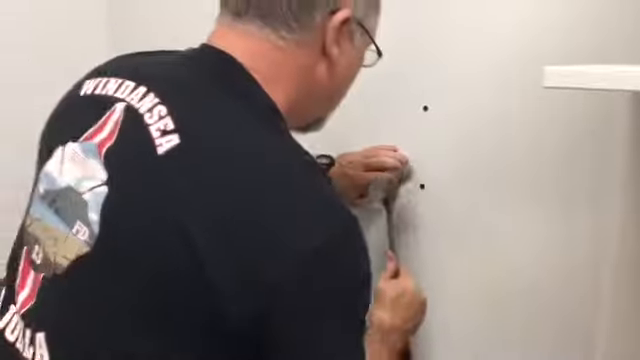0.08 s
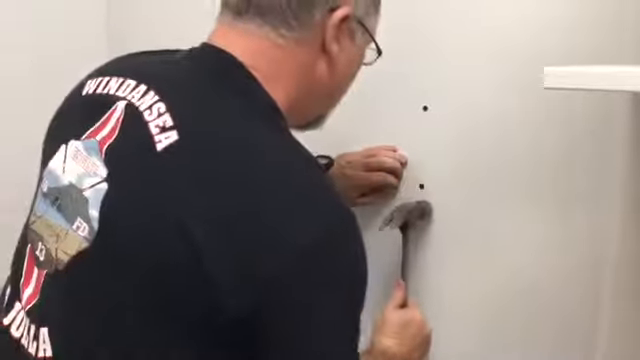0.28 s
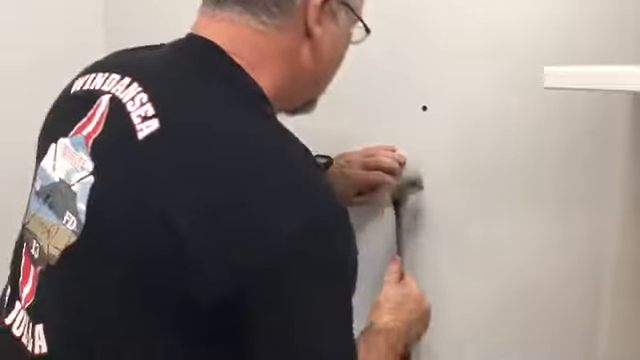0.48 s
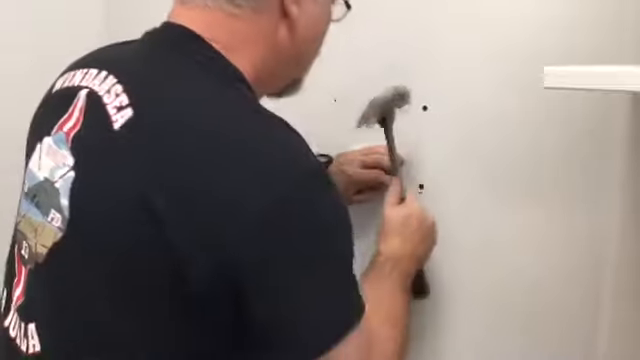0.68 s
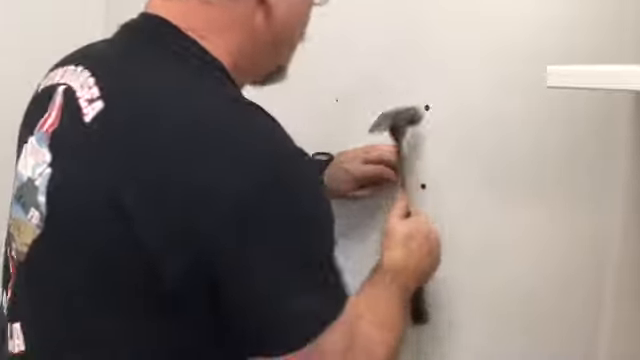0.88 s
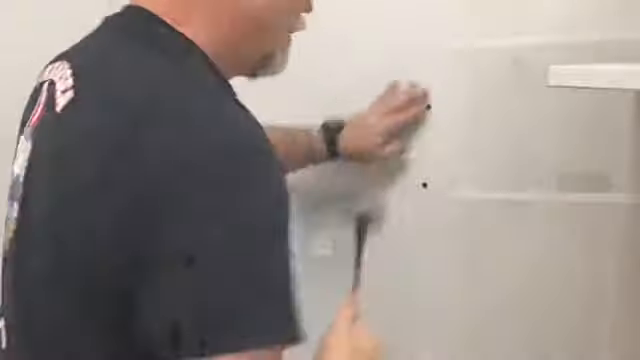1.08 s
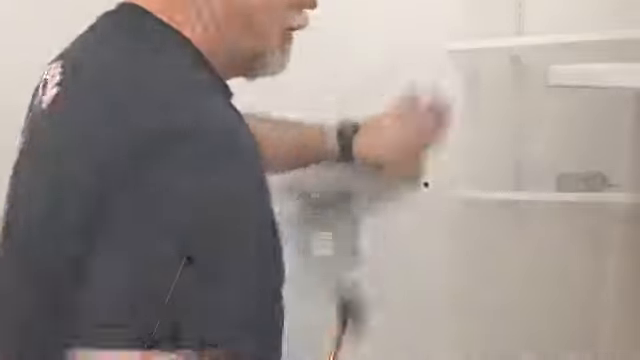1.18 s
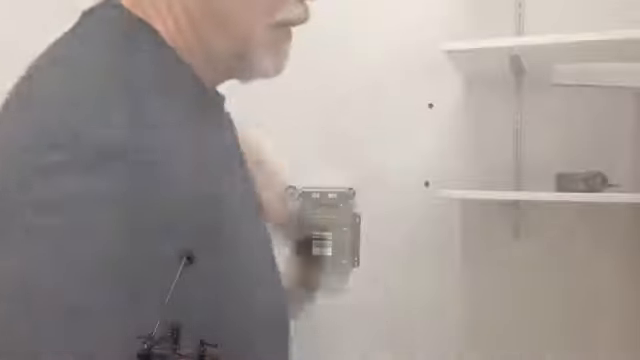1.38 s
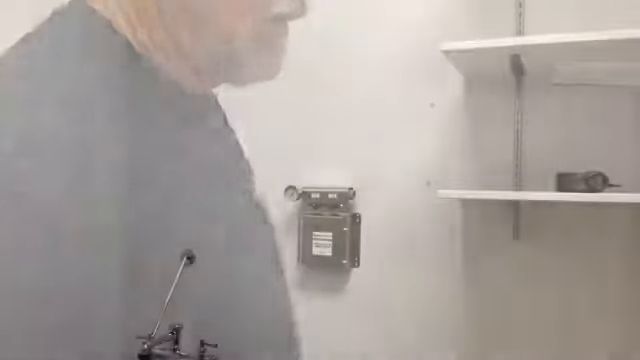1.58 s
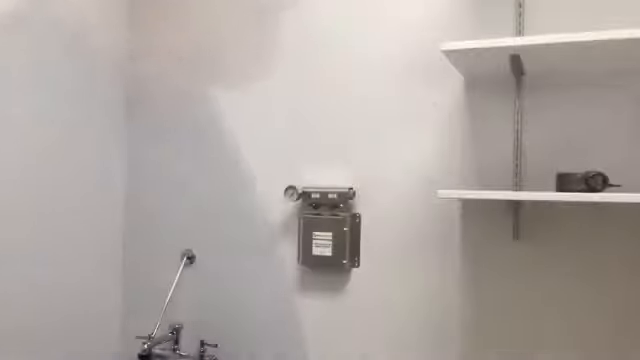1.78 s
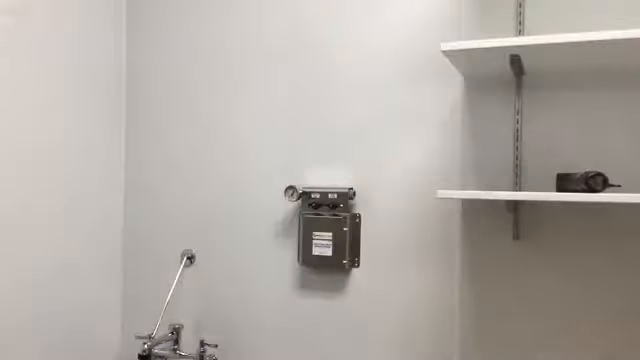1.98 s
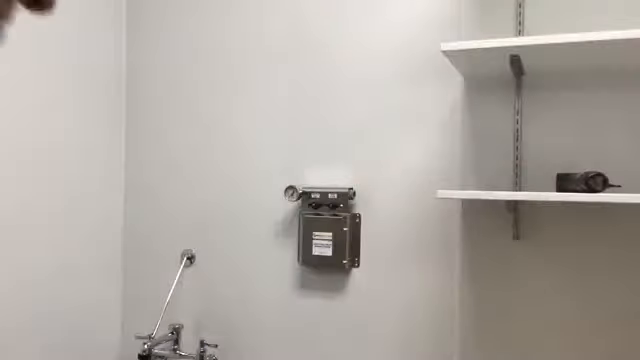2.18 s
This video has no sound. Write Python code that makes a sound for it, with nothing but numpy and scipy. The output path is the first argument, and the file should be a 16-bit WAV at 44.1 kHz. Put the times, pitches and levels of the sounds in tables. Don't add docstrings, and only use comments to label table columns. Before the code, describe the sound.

Hammer blows on a hollow plasterboard wall: a hard, boomy, clipped thud at 0.2 s, a slightly softer one at 0.9 s, each with a short crack and brief small-room ring. From 1.05 to 1.8 s, very faint grainy hand brushing and small squeaks, a dry tick near 1.67 s; soft knocks at 1.98 and 2.1 s, a last brush at 2.13 s. Low rumble, growing hum and faint hiss beneath.

```python
import sys
import numpy as np
from scipy import signal
from scipy.fft import rfft, irfft, next_fast_len
from scipy.io import wavfile
from scipy.ndimage import uniform_filter1d, map_coordinates

SR = 44100
rng = np.random.default_rng(int(sys.argv[2]) if len(sys.argv) > 2 else 0)


def volts_from_decibels(level):
    exponent = np.asarray(level, float) / 20
    return 10 ** exponent


def unload_wav(signal):
    wavfile.write(
        sys.argv[1],
        SR,
        np.round(np.clip(np.atleast_2d(signal).T, -1, 1) * 32767).astype(np.int16),
    )


N = 97020


def unit(x):
    return x / np.sqrt(np.mean(x ** 2) + 1e-20)


def along(points, hz):
    f, v = np.transpose(points)
    return np.interp(np.log(hz + 1), np.log(f + 1), v)


def filtered(x, response):
    m = next_fast_len(len(x) + 8192)
    return irfft(rfft(x, m) * response(np.fft.rfftfreq(m, 1 / SR)), m)[:len(x)]


def hiss(spectrum, size):
    return unit(filtered(rng.standard_normal(size), lambda hz: volts_from_decibels(along(spectrum, hz))))


def wobble(rate):
    knots = rng.standard_normal(int(N * rate / SR) + 4)
    return map_coordinates(knots, [np.arange(N) * rate / SR])


def add(out, x, s):
    part = out[round(s * SR):][:len(x)]
    part += x[:len(part)]


def bend(hz):
    lag_100hz_s = 0.007152
    return -np.exp(-2j * 2 * np.pi * lag_100hz_s * 10 * np.sqrt(hz))


def push(db, size):
    # frequency in Hz, level in dB.
    thump = [(60, -52.5), (110, 20), (300, 15.5), (800, 5), (2000, -11), (4000, -36), (8000, -61),
             (14000, -80.5)]
    click = volts_from_decibels(db) * (np.arange(size) == 0)
    return filtered(click, lambda hz: bend(hz) * volts_from_decibels(along(thump, hz)))


def tail(spectrum, size, late_db):
    # frequency in Hz, time to fall 60 dB in seconds.
    room_decay = [(60, 0.55), (200, 0.28), (1000, 0.27), (3000, 0.23), (8000, 0.2), (14000, 0.18)]
    clump_db, rise_s, late_longer = 1, 0.0013, 3.19
    hz, t, z = signal.stft(hiss(spectrum, size), SR, nperseg=256)
    fall_db = -60 * t / along(room_decay, hz)[:, None]
    clumps = uniform_filter1d(rng.standard_normal(z.shape), size=5, axis=0)
    clumps = unit(uniform_filter1d(clumps, size=3, axis=1))
    decay = volts_from_decibels(fall_db) + volts_from_decibels(late_db + fall_db / late_longer)
    echoes = signal.istft(z * volts_from_decibels(clump_db * clumps) * decay, SR, nperseg=256)[1][:size]
    return echoes * (1 - np.exp(-np.arange(size) / SR / rise_s))


def panel_boom(modes, t):
    boom = np.zeros(len(t))
    for hz, level, t60, rise in modes:
        envelope = volts_from_decibels(level - 60 * t / t60) * (1 - np.exp(-t / rise))
        boom += envelope * np.cos(2 * np.pi * hz * t)
    return filtered(boom, bend)


def steel_crack(t):
    # frequency in Hz, level in dB per Hz.
    crack_colour = [(1000, -29), (2800, 7.5), (4500, -7), (7500, -24.5), (13000, -15)]
    t60_s = .05
    return volts_from_decibels(-25 - 60 * t / t60_s) * hiss(crack_colour, len(t))


def lead_in(size):
    # frequency in Hz, level in dB per Hz.
    lead_colour = [(30, -14), (130, -1.5), (300, -8.5), (600, -19), (1600, -25.5), (3000, -28), (7000, -50.5),
                   (12000, -71.5)]
    lead_db, lead_s, step_s, before_step_db = -26, .05, 0.013, -10.5
    ahead = np.arange(size)[::-1] / SR
    step_db = before_step_db / (1 + np.exp((step_s - ahead) / .001))
    swell = volts_from_decibels(lead_db + step_db - 30.5 * ahead / lead_s)
    return hiss(lead_colour, size) * swell * (1 - np.exp(-ahead / 0.00091))


def hammer():
    # start in seconds, strength in dB, level of the late room sound in dB.
    blows = [
        (0.2233, 3, -21),
        (0.8863, 2, -23.5),
    ]
    # frequency in Hz, level in dB, time to fall 60 dB and rise in seconds.
    panel = [
        [(104, -12.5, 0.12, 0.0011), (129.7, 8.5, 0.078, 0.0049), (156.6, -17, .4, .01),
         (179.6, -18.5, .33, .01), (199, -15, .3, 0.0033), (223.7, -10.5, 0.25, .02),
         (243.6, -10, 0.26, 0.0026), (270, -17, .2, .002), (403.3, -19.5, 0.22, .003), (548, -19, 0.25, 0.0018),
         (595, -22.5, 0.18, 0.006), (868, -19.5, 0.07, .002), (1276, -24, 0.13, 0.0019)],
        [(117.5, -8.5, 0.28, 0.009), (135, 6, 0.099, .002), (172.2, 0, 0.2, 0.0098),
         (193.4, -18.5, 0.43, 0.014), (215.4, -12, .25, 0.015), (248.9, -19, 0.14, 0.0017),
         (289.6, -13.5, 0.067, 0.0031), (338.7, -21, 0.28, 0.011), (465, -22.5, 0.18, .002),
         (533.6, -7.5, 0.051, .002), (623, -29, 0.26, 0.0018), (1025, -18.5, 0.12, 0.00033),
         (1360, -18.5, 0.053, .001)],
    ]
    # frequency in Hz, level in dB per Hz.
    room_colour = [(30, -24.5), (150, -8.5), (330, -8), (600, -17.5), (1600, -19.5), (3200, -35.5),
                   (7000, -48.5), (13500, -52)]
    out, t = np.zeros(N), np.arange(SR) / SR
    lead_size = 2048
    for (s, db, late_db), modes in zip(blows, panel):
        add(out, volts_from_decibels(db) * (panel_boom(modes, t) + push(22, SR)), s)
        add(out, volts_from_decibels(db - 13) * tail(room_colour, SR, late_db), s + .0015)
        add(out, volts_from_decibels(db) * steel_crack(t), s + .0015)
        add(out, volts_from_decibels(db) * lead_in(lead_size), s + 0.0052 - lead_size / SR)
    return out


def brushing(t):
    # start in seconds, length in seconds, level in dB, share of the length spent swelling.
    strokes = [
        (1.056, 0.19, -66, 0.56),
        (1.223, 0.205, -61, 0.56),
        (1.55, 0.095, -69.5, 0.56),
        (2.129, 0.15, -69, 0.42),
    ]
    # frequency in Hz, level in dB per Hz.
    skin_colour = [(880, -53), (1500, -20.5), (1720, -13), (2190, -10), (5460, -8.5), (8140, -10.5),
                   (12600, 0.5), (15300, -3)]
    drag = np.zeros(N)
    for s, length, db, share in strokes:
        ramp = np.interp(t, [s, s + share * length, s + length], [0, 1, 0])
        drag += volts_from_decibels(db) * np.sin(np.pi / 2 * ramp) ** 0.96
    grain_db = 1.2 * wobble(40) + 0.78 * wobble(300)
    return drag * unit(hiss(skin_colour, N) * volts_from_decibels(grain_db))


def hand():
    # start in seconds, pitch in Hz, level in dB, length in seconds.
    squeaks = [(1.222, 3400, -77, .015), (1.25, 6000, -84, .02), (1.273, 2160, -83, 0.035),
               (1.281, 4470, -75, .015), (1.336, 5400, -79.5, 0.018), (1.346, 4400, -68, 0.032),
               (1.578, 2230, -67.5, 0.018), (1.595, 3250, -74, .03), (1.696, 2860, -78.5, .03),
               (1.756, 3486, -72, .04), (1.736, 4160, -76, 0.029), (1.3, 6200, -82, .03),
               (1.367, 6300, -77, .03), (1.6, 4600, -76, .03)]
    spread = .08
    t = np.arange(N) / SR
    out = brushing(t)
    for s, hz, db, length in squeaks:
        noise = rng.standard_normal(4096)
        narrow = filtered(noise, lambda f: 1 / (1 + ((f / hz - 1) / spread) ** 2))
        swell = np.sin(np.pi * np.clip(t[:4096] / length, 0, 1))
        add(out, volts_from_decibels(db) * unit(narrow) * swell, s)
    return out


def tick():
    # start in seconds, peak level in dB.
    ticks = [
        (1.668, -55.5),
    ]
    # frequency in Hz, level in dB.
    tick_colour = [(1200, -22), (2200, -9), (3000, 9.5), (5000, -10), (8000, -14), (14000, -16)]
    out, t = np.zeros(N), np.arange(SR // 3) / SR
    decay = volts_from_decibels(-60 * t / 0.01) + volts_from_decibels(-23 - 60 * t / 0.18)
    for s, db in ticks:
        add(out, volts_from_decibels(db) * hiss(tick_colour, len(t)) * decay, s)
    return out


def light_knocks():
    # start in seconds, level in dB, brightness in dB per octave.
    knocks = [
        (1.9803, -39.5, 2.5),
        (2.0956, -41, -1),
    ]
    # frequency in Hz, level in dB, time to fall 60 dB in seconds.
    knock_modes = [
        [(455, -2, 0.18), (706, -3, 0.057), (1070, -8.5, 0.14), (1480, -13.5, 0.084), (2170, -11, 0.076),
         (2680, -28, .05)],
        [(277, -1.5, 0.15), (380, 0.5, 0.26), (460, -20.5, .06), (720, -35, 0.13), (1006, -7.5, 0.16),
         (1625, -26, 0.069)],
    ]
    soft_hz = 2470
    out, t = np.zeros(N), np.arange(SR // 3) / SR
    for (s, db, tilt), modes in zip(knocks, knock_modes):
        ring = np.zeros(len(t))
        for hz, level, t60 in modes:
            ring += volts_from_decibels(level - 60 * t / t60) * np.cos(2 * np.pi * hz * t)
        colour = [(150, -25), (300, -tilt), (1200, -6 + tilt), (3000, -20 + 2 * tilt), (6000, -50)]
        room = tail(colour, len(t), -22)
        tap = volts_from_decibels(db - 8.5) * filtered(ring, bend) + push(db + 5.0, len(t)) + volts_from_decibels(db - 14.5) * room
        add(out, filtered(tap, lambda f: 1 / (1 + 1j * f / soft_hz) ** 2), s)
    return out


def mains_hum(t):
    # time in seconds, level in dB.
    hum_swell = [(0, -12), (1.4, -10), (1.7, -1), (2.2, 2)]
    hum_hz, width_hz, hum_db = 121, 6.7, -1.5
    noise = rng.standard_normal(N)
    hum = unit(filtered(noise, lambda hz: 1 / (1 + ((hz - hum_hz) / width_hz) ** 2)))
    return volts_from_decibels(hum_db + np.interp(t, *np.transpose(hum_swell))) * hum


def building():
    # frequency in Hz, level in dB per Hz.
    rumble_colour = [(20, -28), (30, -10.5), (90, -2), (210, -4.5), (330, -14), (450, -23.5), (660, -19),
                     (740, -40.5)]
    # time in seconds, level in dB.
    low_level = [(0, -50.5), (.6, -50), (1.3, -48), (1.5, -54), (1.8, -51.5), (2.0, -47.5), (2.2, -47.5)]
    # frequency in Hz, level in dB per Hz.
    hiss_colour = [(741, -32), (1300, -37), (1700, -41), (3300, -47.5), (7500, -55), (12000, -54),
                   (15300, -52.5)]
    # time in seconds, level in dB.
    hiss_level = [(0, -69), (.7, -69), (1.2, -68.5), (1.5, -69.5), (1.75, -68.5), (2.0, -67), (2.2, -67.5)]
    t = np.arange(N) / SR
    rumble = hiss(rumble_colour + [(2000, -86.5)], N) * volts_from_decibels(.8 * wobble(6))
    low = volts_from_decibels(np.interp(t, *np.transpose(low_level))) * (rumble + mains_hum(t))
    hiss_db = np.interp(t, *np.transpose(hiss_level)) + 0.34 * wobble(8)
    return low + volts_from_decibels(hiss_db) * hiss([(500, -67)] + hiss_colour, N)


def scene():
    return (hammer() + hand() + tick() + light_knocks() + building())[None]


def top_cut(x):
    return signal.sosfilt(signal.butter(12, 15770, fs=SR, output="sos"), x)


def record(dry):
    clip_top, clip_hard, top_hz = .99, 4, 15350
    hot = dry[0] / (1 + np.abs(dry[0] / clip_top) ** clip_hard) ** (1 / clip_hard)

    def treble_cut(hz):
        return .002 + 1 / (1 + np.exp(np.clip((hz - top_hz) / 40, -50, 50)))

    return top_cut(filtered(hot, treble_cut)[None])


dry = scene()
out = record(dry)
unload_wav(out)
```